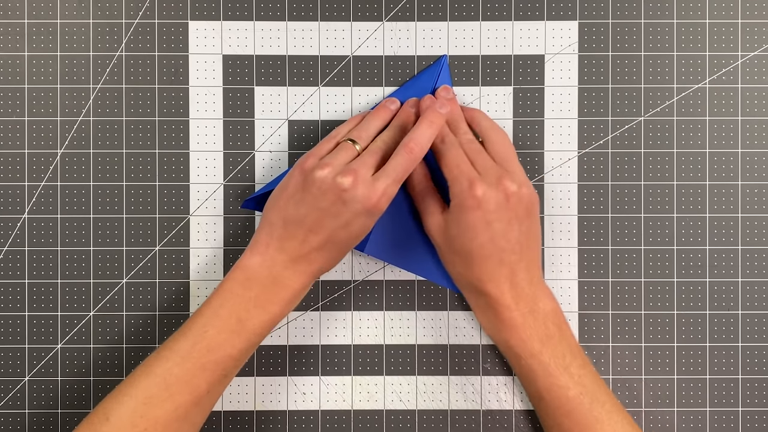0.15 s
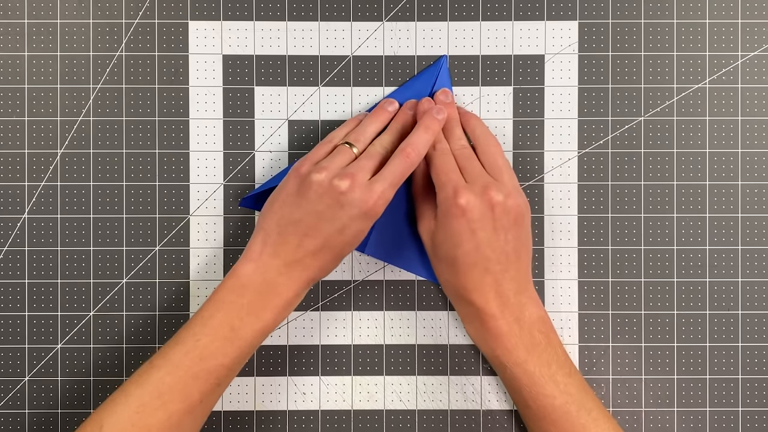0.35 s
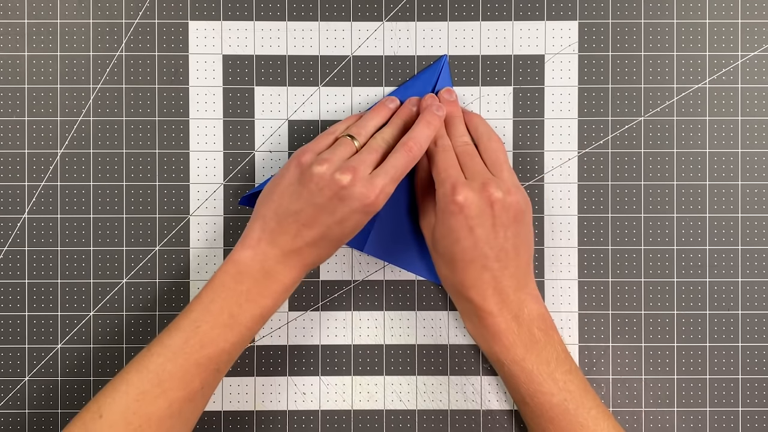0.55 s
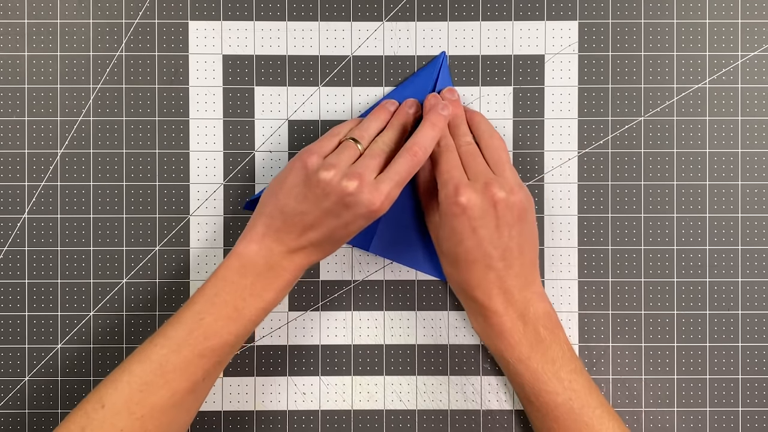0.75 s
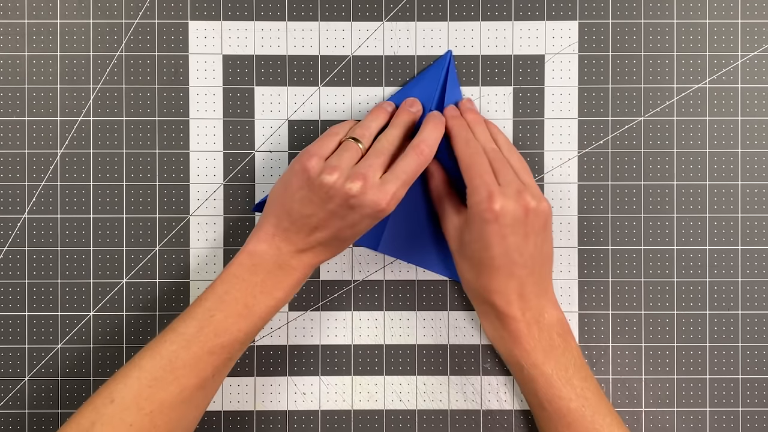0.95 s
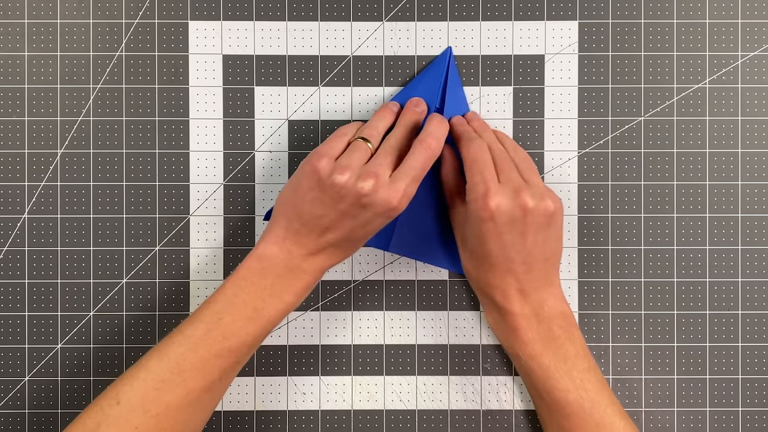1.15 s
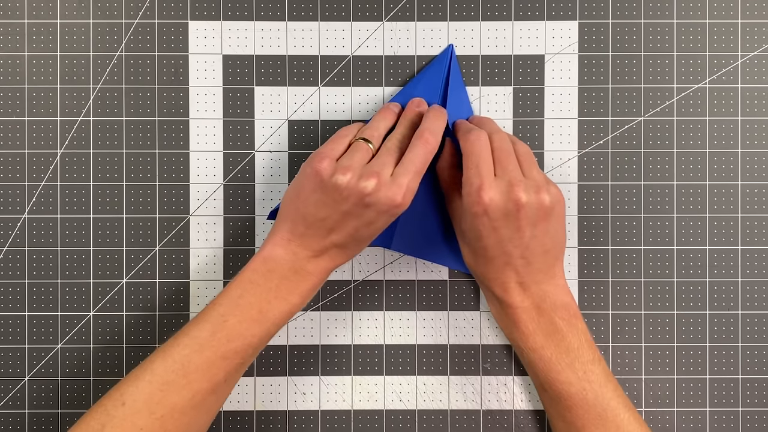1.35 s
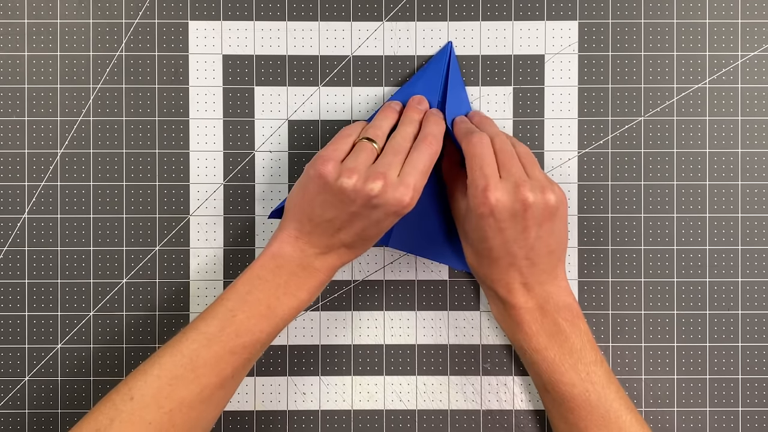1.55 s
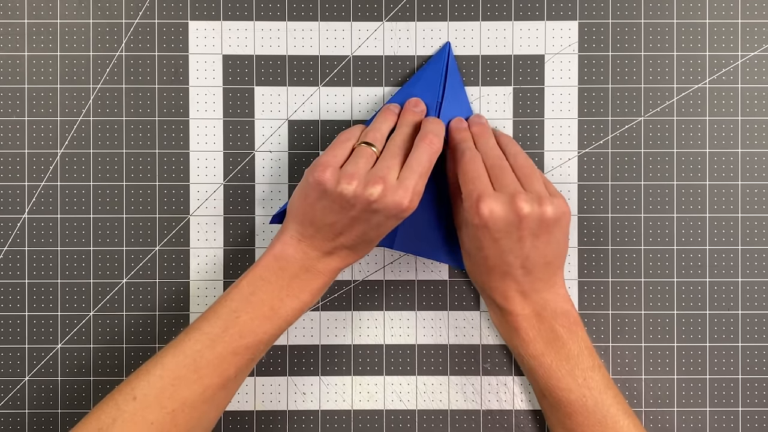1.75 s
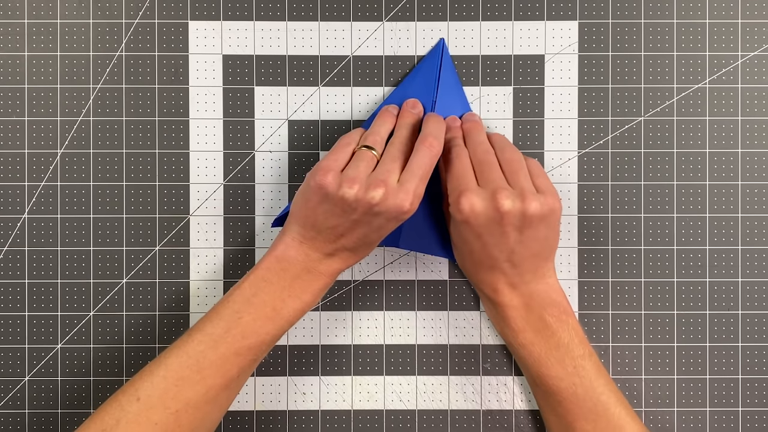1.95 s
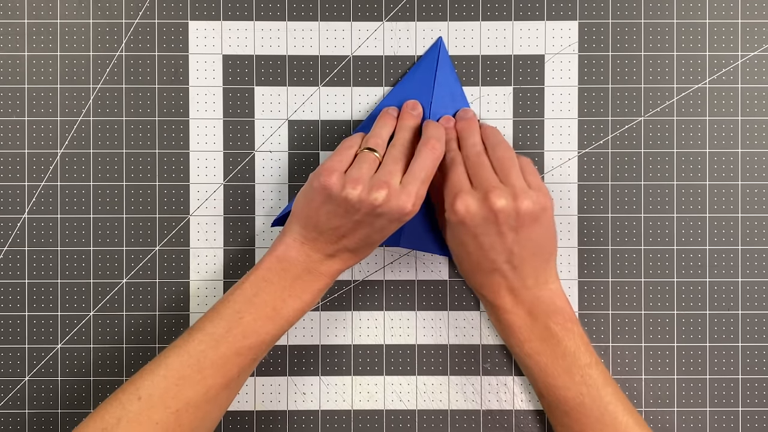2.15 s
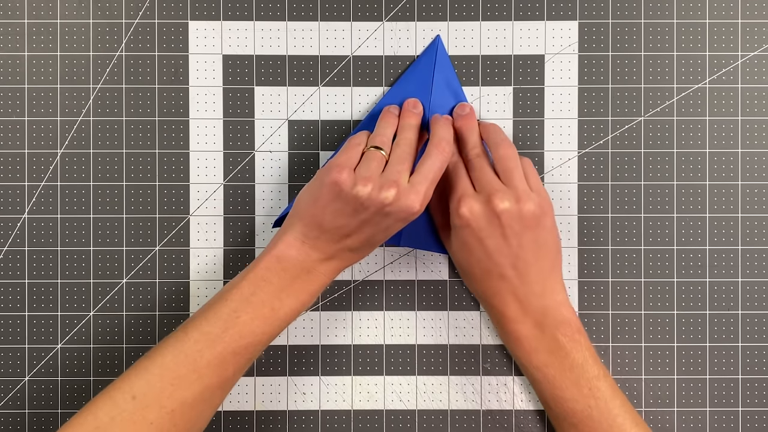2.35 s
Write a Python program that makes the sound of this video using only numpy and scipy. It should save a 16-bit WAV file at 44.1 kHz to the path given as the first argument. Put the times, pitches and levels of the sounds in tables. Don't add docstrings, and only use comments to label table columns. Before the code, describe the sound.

Paper folding up close: three short clusters of crisp crackles and dry sliding rustles, with faint ticks and soft fingertip knocks between them, in a small quiet room with low air noise, close stereo microphone.

```python
import sys
import numpy as np
from scipy import signal
from scipy.io import wavfile
from scipy.ndimage import uniform_filter1d

SR = 44100
rng = np.random.default_rng(int(sys.argv[2]) if len(sys.argv) > 2 else 0)


def digitize_waveform(pressure):
    field = np.atleast_2d(pressure).T
    bounded = np.clip(field, -1, 1)
    quanta = np.round(bounded * 32767).astype(np.int16)
    wavfile.write(sys.argv[1], SR, quanta)


def elevation(decibels):
    levels = np.asarray(decibels, float)
    return 10 ** (levels / 20)


N = 110250


def read(points, hz):
    f, value = np.transpose(points)
    return np.interp(np.log(hz + 1), np.log(f + 1), value)


def evened(x):
    return x / np.sqrt(np.mean(x ** 2) + 1e-20)


def peaked(x):
    return x / (abs(x).max() + 1e-12)


def add(mix, s, sound):
    part = mix[round(s * SR):][:len(sound)]
    part += sound[:len(part)]


def wander(hz):
    return evened(signal.lfilter(*signal.butter(2, hz, fs=SR), rng.standard_normal(N)))


def smooth_patches(shape, bins, frames):
    patches = uniform_filter1d(rng.standard_normal(shape), size=bins, axis=0)
    return evened(uniform_filter1d(patches, size=frames, axis=1))


def coloured(x, db_of):
    gain_db = np.maximum(db_of(abs(np.fft.fftfreq(8192, 1 / SR))), -100)
    spectrum = np.exp(np.conj(signal.hilbert(np.log(elevation(gain_db)))))
    taps = np.fft.ifft(spectrum).real[:4096]
    return signal.oaconvolve(x, taps)[:len(x)]


def body(x):
    return signal.sosfilt(signal.butter(3, 5000, fs=SR, output="sos"), x)


def treble(x):
    return signal.sosfilt(signal.butter(3, 5000, "high", fs=SR, output="sos"), x)


def band_boost_db(hz):
    # (frequency [Hz], width [Hz], boost [dB])
    modes = [(1079, 185, 11), (1400, 216, 9.5), (3210, 1130, 10), (4225, 270, 3)]
    return sum(db / (1 + (2 * (hz - f) / width) ** 2) for f, width, db in modes)


def sheet_db(hz):
    # (frequency [Hz], spectral level [dB])
    plate = [(150, -13.5), (600, -8), (1200, -5.5), (2200, 0.5), (4000, -6.5), (5000, -1.5), (9000, -3.5),
             (15500, -18)]
    return read(plate, hz) + band_boost_db(hz)


def air():
    # (frequency [Hz], spectral level [dB])
    air_colour = [(15, -50), (25, -5), (206, 2), (677, -3), (1100, -8.5), (1890, -4.5), (3160, -6.5),
                  (14400, -20), (16000, -20)]
    level_db, patch_db = -61.5, 3.4
    hz, _, z = signal.stft(rng.standard_normal(N + 1024), SR, nperseg=1024)
    colour_db = read(air_colour, hz) + 0.57 * band_boost_db(hz)
    z = z * elevation(colour_db[:, None] + patch_db * smooth_patches(z.shape, 10, 6))
    return elevation(level_db) * evened(signal.istft(z, SR, nperseg=1024)[1][:N])


def mains_drone():
    level = elevation(-76 + 2 * wander(4))
    turns = np.cumsum(47 + 3 * wander(5)) / SR
    return level * np.sin(2 * np.pi * turns)


def hiss():
    # (frequency [Hz], spectral level [dB])
    hiss_colour = [(40, 0), (112, -2), (3600, -9.5), (15000, -6)]
    noise = coloured(rng.standard_normal(N), lambda hz: read(hiss_colour, hz))
    return elevation(-72) * evened(noise)


def stroke_grains():
    slips_per_s, size_spread_db, grain_s = 1200, 3.2, .0008
    smooth_db, clump_db, facet_db = -1, 1.2, 2.6
    sizes = elevation(size_spread_db * np.minimum(rng.exponential(1, N), 3))
    slips = sizes * (rng.random(N) < slips_per_s / SR)
    slips = signal.lfilter([1], [1, -np.exp(-1 / (grain_s * SR))], slips ** 2) ** .5
    drive = evened(slips * rng.standard_normal(N)) + elevation(smooth_db) * rng.standard_normal(N)
    z = signal.stft(drive * elevation(clump_db * wander(40)), SR, nperseg=128)[2]
    z = z * elevation(facet_db * smooth_patches(z.shape, 2, 8))
    return evened(coloured(signal.istft(z, SR, nperseg=128)[1][:N], sheet_db))


def strokes():
    # (loudest time [s], rise [dB/s], fall [dB/s], level [dB], treble relative to level [dB])
    slides = [(0.028, 147, 345, -55.5, -6), (0.227, 237, 117, -49, 0), (0.263, 109, 364, -38, -10.5),
              (.328, 508, 414, -38.5, -1), (0.387, 3000, 310, -40, -3), (0.642, 402, 314, -51, -8),
              (0.759, 2993, 135, -50.5, -42), (0.874, 266, 440, -48, 3.5), (.96, 900, 66, -53, -4.5),
              (1.374, 679, 376, -42.5, -12), (1.431, 1505, 233, -41, -9.5), (1.799, 508, 386, -45.5, -5),
              (2.013, 280, 250, -48.5, -31), (2.108, 507, 409, -40.5, -12.5), (2.203, 911, 344, -30.5, -5),
              (2.43, 138, 86, -56, -15)]
    t = np.arange(N) / SR
    grains = stroke_grains()
    low, top = np.zeros((2, N))
    for s, rise, fall, db, treble_db in slides:
        below_db = np.where(t < s, rise * (s - t), fall * (t - s))
        shape = elevation(db - np.minimum(below_db, 80))
        low = low + shape
        top = top + shape * elevation(treble_db)
    return low * body(grains) + top * treble(grains)


def snaps():
    # (time [s], body peak level [dB], ring frequency
    # [Hz], treble peak level [dB])
    creases = [(0.0182, -44.4, 1100, -51.3), (0.0952, -36.8, 1210, -46.4), (0.1216, -30.0, 2910, -56.5),
               (0.3009, -29.7, 3510, -38.6), (0.3141, -23.7, 3420, -33.6), (0.3225, -24.3, 3510, -31.5),
               (0.3261, -21.5, 3400, -29.2), (0.3396, -28.0, 3470, -37.1), (0.3788, -20.1, 3490, -25.0),
               (0.3796, -20.1, 1380, -24.0), (0.3839, -16.4, 1530, -21.0), (0.4453, -46.2, 2990, -42.4),
               (0.4635, -39.8, 2000, -50.4), (0.4795, -40.3, 950, -54.0), (0.5049, -36.2, 1850, -53.1),
               (0.624, -39.5, 3210, -47.2), (0.6345, -38.0, 3190, -46.0), (0.6427, -33.2, 4350, -38.6),
               (0.7575, -36.2, 1120, -52.2), (0.764, -37.9, 1080, -48.5), (0.7784, -37.4, 1460, -57.4),
               (0.7867, -39.2, 1030, -55.7), (0.8319, -33.7, 2970, -43.9), (0.9579, -42.2, 1250, -51.5),
               (0.9999, -40.6, 2780, -54.3), (1.1893, -45.6, 3190, -59.0),
               (1.2986, -38.3, 1120, -52.3), (1.3365, -29.4, 2800, -36.7), (1.3521, -32.8, 1120, -34.7),
                   (1.3604, -35.3, 2760, -41.9), (1.3661, -34.7, 2910, -42.1), (1.3753, -32.5, 1250, -41.3),
                   (1.4061, -38.1, 1210, -50.3), (1.4141, -25.3, 1440, -27.9), (1.4171, -22.9, 1250, -30.9),
                   (1.4207, -27.6, 3290, -36.6), (1.4261, -18.3, 4260, -27.3), (1.43, -25.3, 1310, -31.2),
                   (1.4523, -25.8, 3360, -37.4), (1.5126, -36.6, 5840, -29.2), (1.6, -45.1, 1060, -55.6),
                   (1.6986, -41.7, 1140, -55.5), (1.7279, -45.1, 1160, -56.6), (1.7551, -39.8, 1160, -52.1),
                   (1.7935, -33.3, 1140, -47.6), (1.7979, -37.0, 2580, -45.2), (1.9332, -42.6, 1080, -55.0),
               (1.9907, -36.2, 1120, -47.0), (2.0158, -40.9, 1010, -48.3), (2.0296, -37.1, 1120, -53.8),
                  (2.0448, -36.9, 1060, -61.4), (2.0604, -35.9, 1030, -42.1), (2.0765, -33.5, 1420, -48.3),
                  (2.0925, -30.0, 1510, -39.1), (2.1118, -29.5, 1440, -43.2), (2.1417, -40.1, 3380, -51.5),
                  (2.1704, -31.6, 2990, -45.8), (2.188, -33.1, 3120, -32.1), (2.1929, -21.0, 3770, -26.8),
                  (2.2023, -25.0, 3270, -22.0), (2.2096, -23.5, 2630, -31.7), (2.365, -43.7, 2130, -55.4),
                  (2.3749, -44.7, 1360, -58.6), (2.3929, -43.1, 1140, -61.8), (2.4106, -42.3, 1180, -48.9),
                  (2.4195, -37.4, 1440, -56.5), (2.4335, -39.5, 1420, -57.1), (2.4507, -32.1, 2000, -38.8),
                  (2.4707, -42.9, 2370, -59.1)]
    attack_s, burst_s, after_s, after_db = .0004, .0011, .006, -20
    ring_cycles, ring_db = 5.5, -3
    body_trim_db, treble_trim_db = -1.2, -1
    t, out = np.arange(1500) / SR, np.zeros(N)
    decay = np.exp(-t / burst_s) + elevation(after_db) * np.exp(-t / after_s)
    envelope = np.minimum(t / attack_s, 1) * decay
    bass_cut = signal.butter(3, 880, "high", fs=SR, output="sos")
    for s, db, hz, treble_db in creases:
        noise, unevenness = rng.standard_normal((2, len(t)))
        burst = noise * elevation(3 * unevenness) * envelope
        facet = np.sin(2 * np.pi * hz * t) * np.exp(-3 * t * hz / ring_cycles)
        ring = signal.fftconvolve(burst, facet)[:len(t)]
        sheet = peaked(coloured(burst, sheet_db)) + elevation(ring_db) * peaked(ring)
        sheet = signal.sosfilt(bass_cut, sheet)
        snap = elevation(db + body_trim_db) * peaked(body(sheet))
        snap = snap + elevation(treble_db + treble_trim_db) * peaked(treble(sheet))
        add(out, s - attack_s, snap)
    return out


def thuds():
    # (time [s], peak level [dB], pitch [Hz])
    knocks = [(0.122, -42.5, 540), (.382, -39.5, 300), (.643, -53.5, 304), (0.756, -47, 367),
              (.846, -43, 545), (1.301, -58, 250), (1.333, -46, 454), (1.359, -44.5, 327),
              (1.512, -43, 378), (1.697, -52, 340), (1.756, -47.5, 530), (1.792, -43, 307),
              (2.141, -55, 220), (2.192, -41, 464)]
    decay_cycles = 2.4
    t, out = np.arange(2500) / SR, np.zeros(N)
    for s, db, hz in knocks:
        envelope = np.minimum(t * hz, 1) * np.exp(-3 * t * hz / decay_cycles)
        add(out, s, elevation(db) * peaked(np.sin(2 * np.pi * hz * t) * envelope))
    return out


def hums():
    # (loudest time [s], length [s], level [dB], frequency [Hz])
    presses = [
        (.255, .02, -59, 250),
        (.437, .03, -55, 205),
        (.505, .022, -61, 190),
        (.765, .02, -62, 160),
        (2.222, .045, -55, 201),
        (2.4, .05, -63, 202),
    ]
    waver_hz, rise_share = 7, .6
    t, out = np.arange(N) / SR, np.zeros(N)
    for s, length, db, hz in presses:
        turns = np.cumsum(hz + waver_hz * wander(24.9)) / SR
        reach = (t - s) / np.where(t < s, rise_share * length, length)
        out += elevation(db - 12 * reach ** 2 + 2 * wander(30)) * np.sin(2 * np.pi * turns)
    return out


def room(x):
    # (frequency [Hz], time to fall by 60 dB [s])
    decay_times = [(150, 0.09), (400, 0.36), (1040, 0.15), (2760, 0.14), (7280, 0.06)]
    taps = np.zeros(22000)
    at = np.arange(120, 21900, 20)
    taps[at + rng.integers(0, 20, len(at))] = rng.choice([-1., 1.], len(at))
    hz, t, z = signal.stft(taps, SR, nperseg=128)
    t60 = np.maximum(read(decay_times, hz), .03)[:, None]
    tail = signal.istft(z * elevation(-60 * t / t60), SR, nperseg=128)[1]
    return signal.fftconvolve(x, tail / np.linalg.norm(tail))[:N]


def scene():
    paper = strokes() + snaps() + thuds() + hums()
    mid = paper + elevation(-12.5) * room(paper) + air() + mains_drone()
    side = elevation(-26) * room(2 * treble(paper) + .5 * paper) + hiss()
    return np.array([mid + side, mid - side])


def top_cut(x):
    return signal.sosfilt(signal.butter(12, 16830, fs=SR, output="sos"), x)


def record(dry):
    cut = signal.sosfilt(signal.butter(4, 36, "high", fs=SR, output="sos"), dry)
    edge = signal.firwin(101, 15700, window=("kaiser", 5), fs=SR)
    mix = signal.oaconvolve(cut, edge[None], "same")
    return top_cut(mix)


dry = scene()
out = record(dry)
digitize_waveform(out)
```